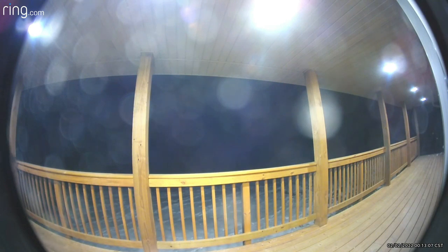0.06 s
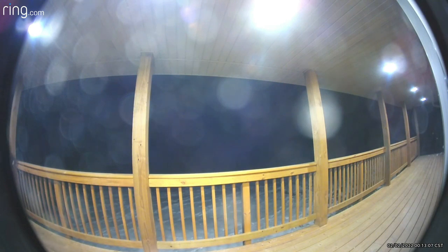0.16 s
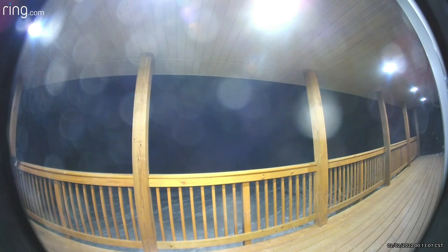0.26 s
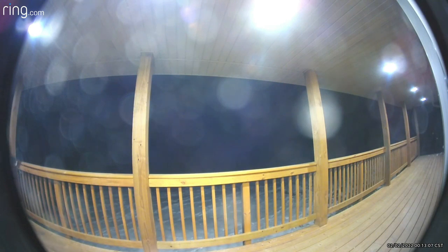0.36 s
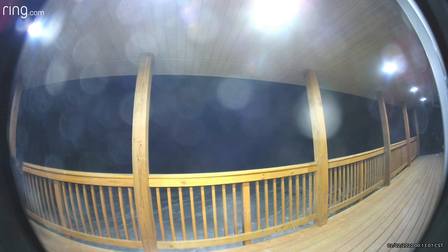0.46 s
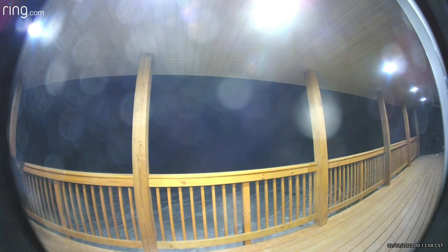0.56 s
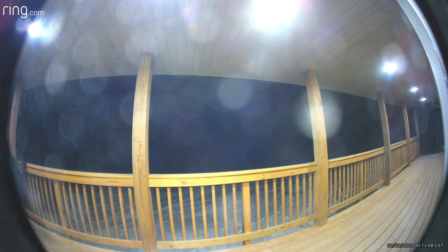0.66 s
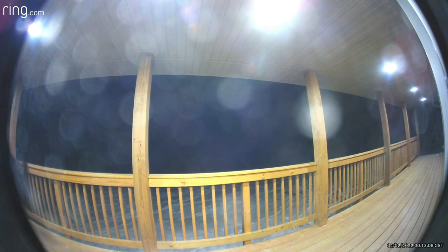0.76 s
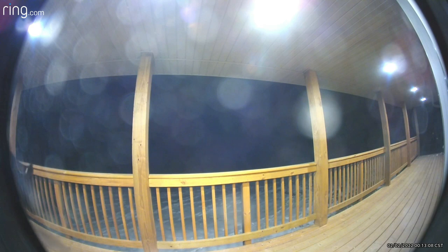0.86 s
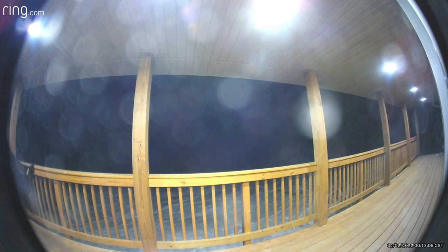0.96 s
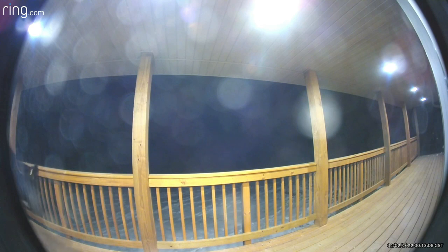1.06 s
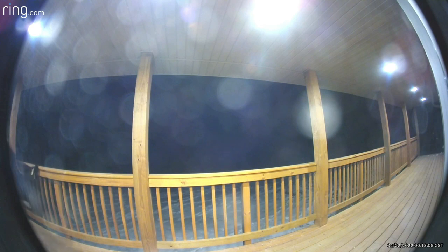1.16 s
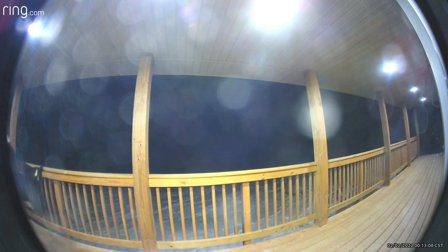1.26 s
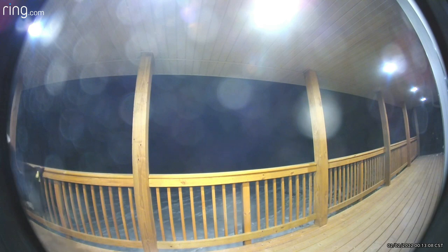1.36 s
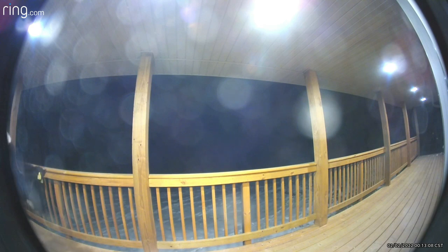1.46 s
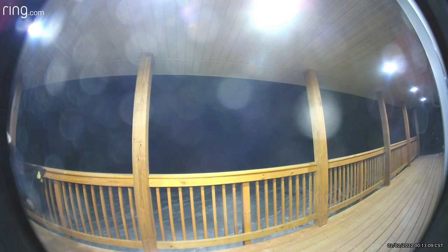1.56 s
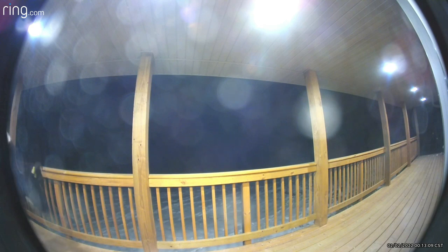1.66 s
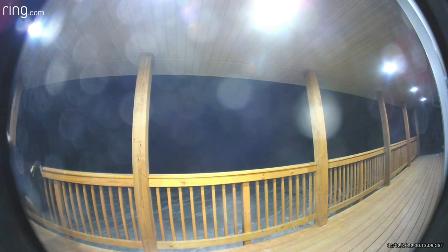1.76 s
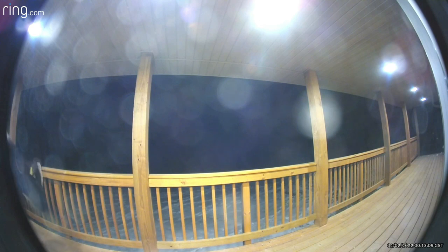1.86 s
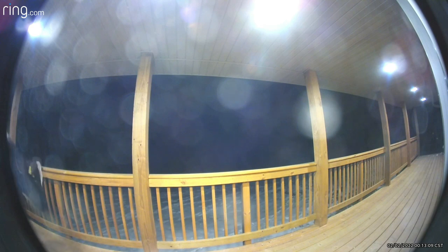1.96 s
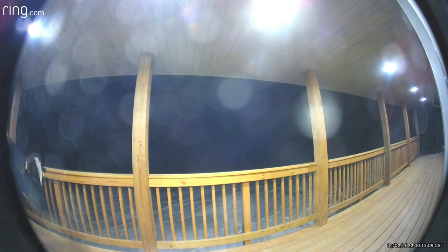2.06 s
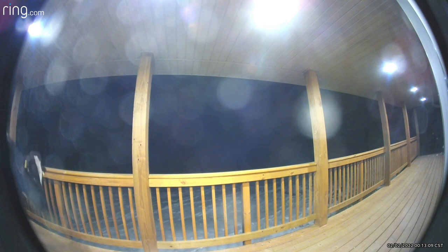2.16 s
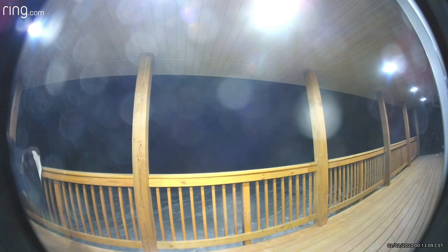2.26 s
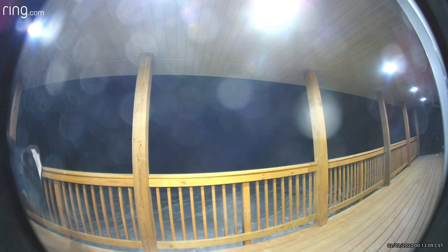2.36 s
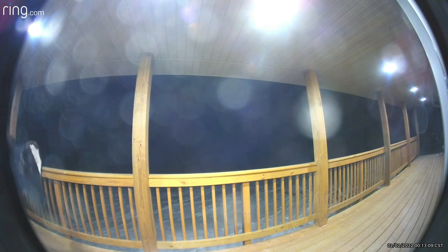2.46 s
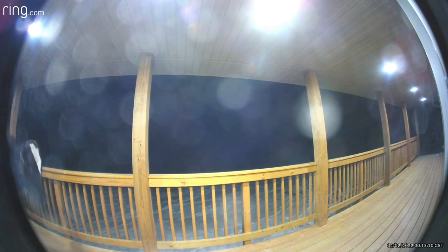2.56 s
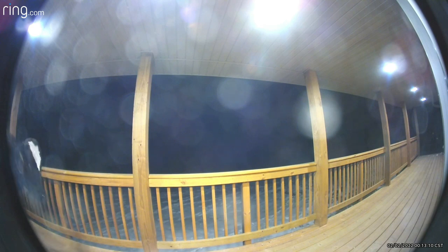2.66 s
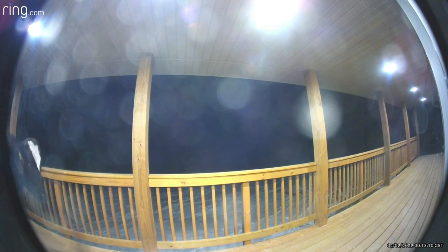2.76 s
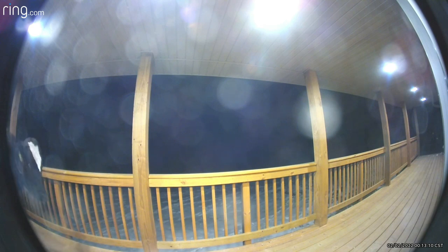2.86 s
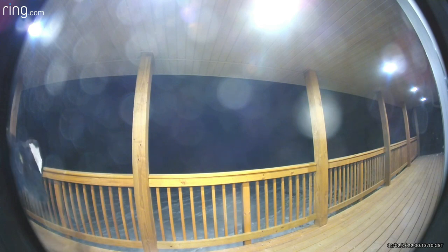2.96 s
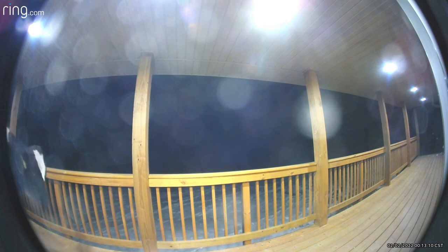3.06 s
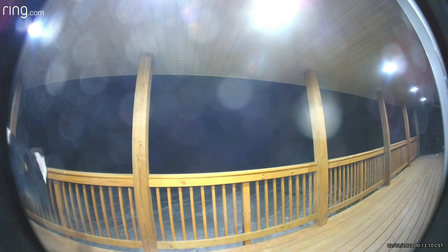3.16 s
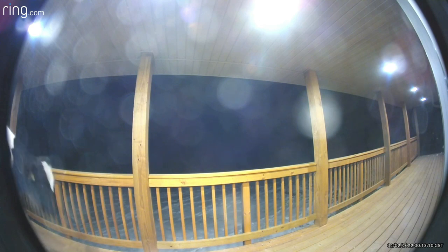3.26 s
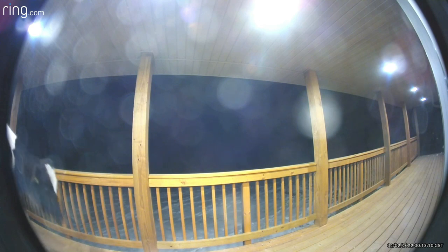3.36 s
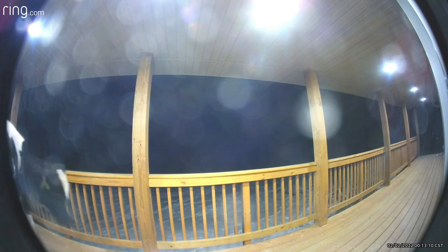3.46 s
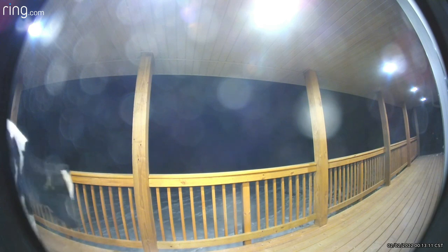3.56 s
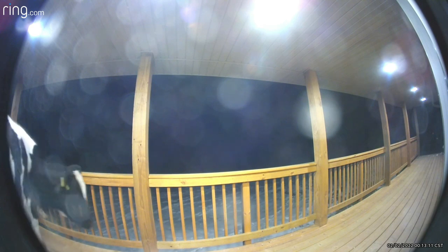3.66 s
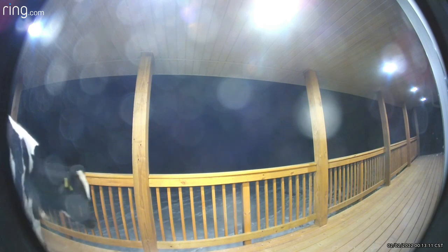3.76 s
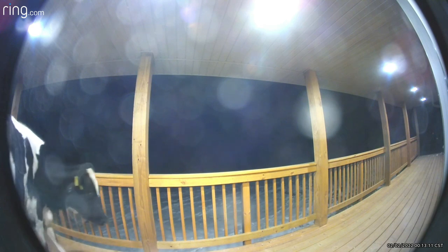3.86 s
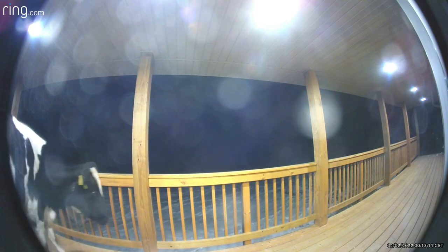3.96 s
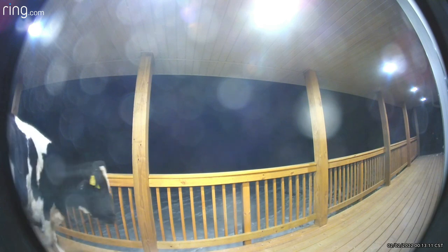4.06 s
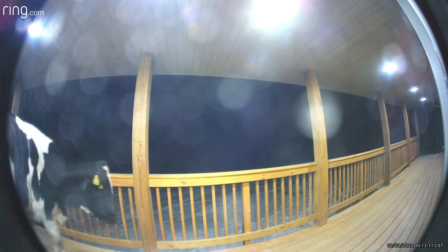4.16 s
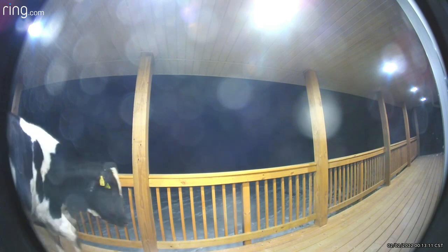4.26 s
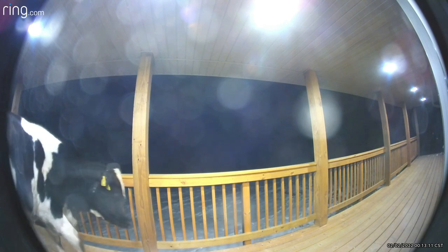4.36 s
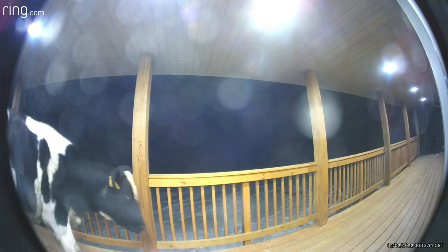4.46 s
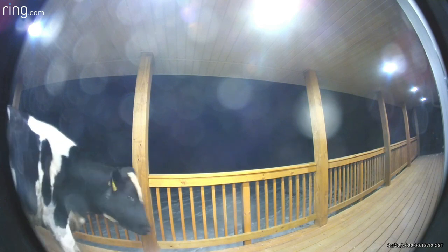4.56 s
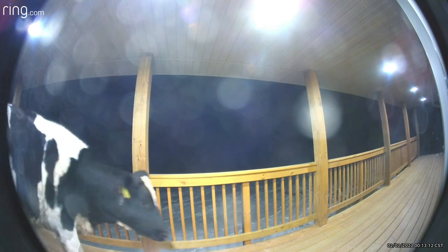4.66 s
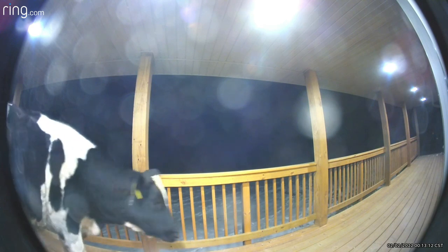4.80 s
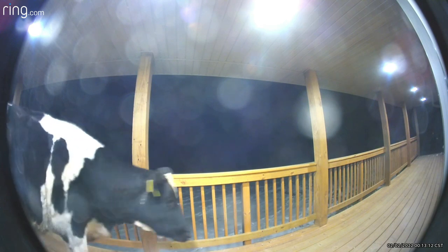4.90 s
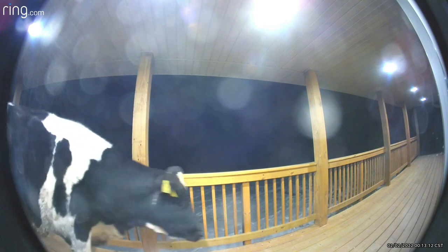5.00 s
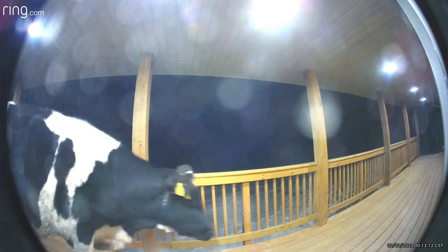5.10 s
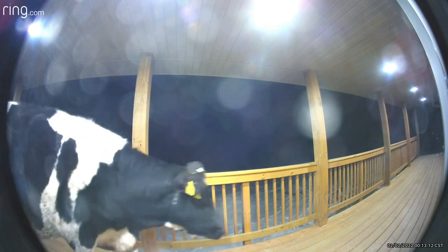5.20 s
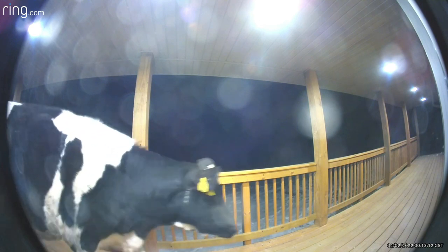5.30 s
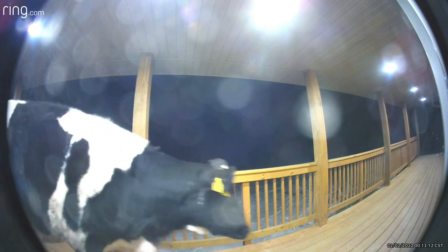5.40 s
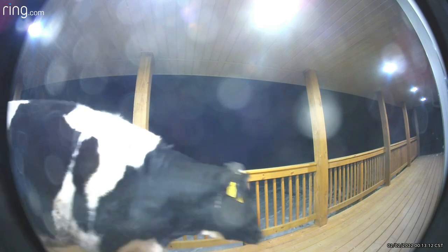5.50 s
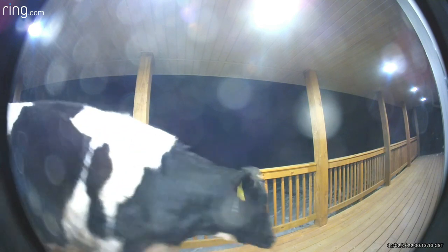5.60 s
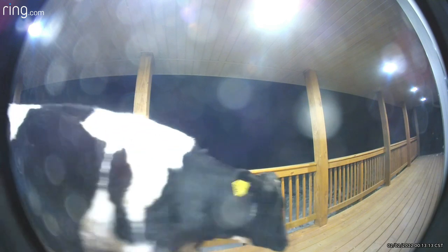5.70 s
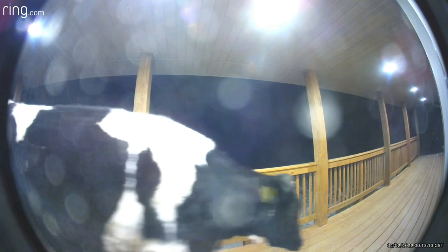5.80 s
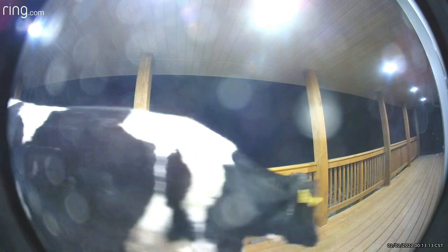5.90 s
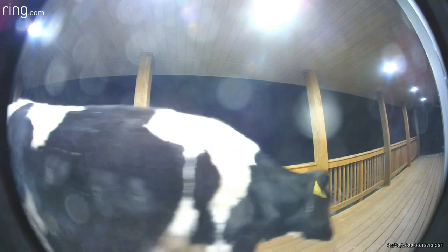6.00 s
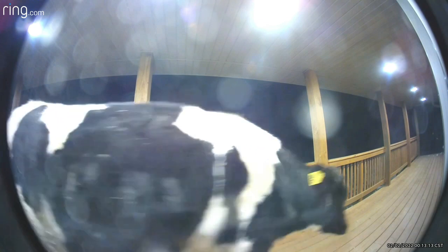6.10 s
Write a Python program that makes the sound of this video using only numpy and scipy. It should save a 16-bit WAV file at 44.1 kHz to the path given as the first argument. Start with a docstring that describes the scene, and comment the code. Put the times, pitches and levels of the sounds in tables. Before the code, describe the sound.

On a roofed wooden porch, a cow steps onto the planks. A few hollow double knocks come early, followed by a quiet gap with faint taps and scuffing. Then heavy hooves resume, closer, denser and louder, with woody thumps, brief scrapes, dry rustling and low deck rumble. A small narrow-band microphone by the door makes everything boxy and slightly dull.

```python
"""A roofed wooden porch: a cow steps up onto the planks and walks towards a small microphone by the door.
Each footfall is two blows, toe then heel; noisy contact forces drive wood resonances and joist sines.
Echo under the roof shrinks as the hooves come nearer. Light taps, sliding hooves and slow deck heaves join in.
Shaped noise makes the deck rumble, hoof scuffs and dry rustling between steps.
The microphone passes a narrow band with a faint treble leak, clips softly and adds a little hiss."""
import sys
import numpy as np
from scipy import signal
from scipy.fft import rfft, irfft, next_fast_len
from scipy.io import wavfile
from scipy.ndimage import uniform_filter1d

SR = 44100
rng = np.random.default_rng(int(sys.argv[2]) if len(sys.argv) > 2 else 0)


def unload_wav(signal):
    """Save mono or channel-first audio to the path in sys.argv[1] as 16-bit WAV at rate SR, clipped to [-1, 1]."""
    wavfile.write(
        sys.argv[1],
        SR,
        np.round(np.clip(np.atleast_2d(signal).T, -1, 1) * 32767).astype(np.int16),
    )


N = 270774

BLOW_S = 0.6  # longest sound of one contact
ATTACK_S = 0.03  # opening stretch that sets the level of a blow
T = np.arange(int(BLOW_S * SR)) / SR

# footfalls: (time [s], plank low mode [Hz], plank high mode [Hz], top of the knock [Hz], strength [dB],
# hardness = toe knock over plank body [dB], weight = toe joist thud over plank body [dB],
# heel after toe [s], heel over toe [dB])
FOOTFALLS = [(0.4885, 434, 1110, 1500, -36, 0.5, -26, 0.024, 0),
             (0.57, 533, 1066, 1460, -23.5, 2.5, -25, 0.013, -8),
             (0.8293, 166, 1210, 2000, -30.5, -5.5, 10, .014, -5),
             (0.8705, 399, 1056, 1700, -14, -1.5, -28, .018, -4),
             (1.8112, 594, 780, 1270, -20, 1.5, -12.5, 0.011, 0.5),
             (3.5272, 410, 987, 1770, -13, -2.5, -11, 0.022, -5),
             (3.794, 354, 810, 1194, -24.5, 5.5, -25.5, 0.016, -6.5),
             (3.925, 404, 686, 1670, -14, -2.5, -12, .031, -6.5),
             (4.051, 216, 780, 1420, -20.5, 5.5, -10, 0.022, 7.5),
             (4.1096, 354, 1020, 1680, -19, 2.5, -8, 0.022, -11),
             (4.317, 395, 743, 1480, -22, 5, -10.5, 0.018, 1.5),
             (4.631, 471, 760, 1780, -16.5, 5.5, -29, .012, -11),
             (4.7663, 409, 745, 1560, -18.5, -4.5, -13.5, 0.017, -4.5),
             (4.9306, 227, 842, 1860, -15, -2, -9, .02, -7.5),
             (4.9391, 379.5, 906, 1970, -6.5, -7, -13, 0.023, -6.5),
             (5.087, 385, 780, 1050, -22, -1, -16, 0.024, -2),
             (5.179, 207.6, 840, 1770, -14, -0.5, -8.5, .021, 0),
             (5.366, 375, 1480, 1990, -29, 0, -15, .022, 4),
             (5.455, 538, 820, 1930, -7, -6.5, -9, 0.011, -10),
             (5.5078, 428, 876, 1470, -15.5, -16.5, -22, .02, -13),
             (5.5449, 457, 1140, 1860, -16.5, -7.5, -20, 0.011, -10),
             (5.6103, 369, 1160, 1890, -14.5, 7, -10, .014, -3.5),
             (5.6541, 447, 1190, 1760, -16.5, -5, -11, .02, -15),
             (5.695, 292, 1095, 1600, -20.5, -9.5, -7, 0.023, -6),
             (6.0251, 359, 750, 1820, -12.5, -2, -3, 0.031, -4.5),
             (6.0823, 406, 773, 1370, -27, 1, -15, .02, -16)]
# resonances of the planking, before scatter: (frequency [Hz], width [Hz], level [dB])
PLANK_RESONANCES = [(222.6, 61, -6.5), (304.7, 42, -1), (409.7, 60.4, 2), (514, 122, 0.5), (643, 414, -7)]
# resonances of horn on wood, before scatter: (frequency [Hz], width [Hz], level [dB])
KNOCK_RESONANCES = [(728, 174, -1.5), (1037, 354, 4), (1250, 478, 5), (1405, 231, 2), (1723, 250, -13)]
# spectrum of the sharp crack at contact: (frequency [Hz], level [dB])
CRACK_COLOUR = [(900, -22), (1700, -3.5), (2200, 2.5), (2700, 1.5), (3500, 5), (4400, -0.5), (5500, -1.5),
                (9000, -25)]
# spectrum of a hoof rubbing the grain: (frequency [Hz], level [dB])
SCUFF_COLOUR = [(100, -18.5), (200, -6.5), (300, 2.5), (420, 0.5), (620, -6), (800, -7.5), (1150, -13.5),
                (1600, -16.5), (2400, -28.5), (4000, -30)]


def hooves():
    """Every footfall is two blows on the same plank: the hard toe, then the heel."""
    toe_ring_t60_s, heel_ring_t60_s = 0.055, 0.099
    # the heel is softer in contact and has less joist thud over its plank body
    heel_hardness_db, heel_weight_db = -9.5, -3
    out = np.zeros(N)
    for s, low_hz, high_hz, top_hz, db, hardness_db, weight_db, heel_s, heel_db in FOOTFALLS:
        toe = blow(s, low_hz, high_hz, top_hz, db, hardness_db, weight_db, toe_ring_t60_s)
        heel = blow(s, low_hz, high_hz, top_hz, db + heel_db, hardness_db + heel_hardness_db,
                    weight_db + heel_weight_db, heel_ring_t60_s)
        add(out, s, toe)
        add(out, s + heel_s, heel)
    return out


def blow(s, low_hz, high_hz, top_hz, body_db, hardness_db, weight_db, ring_t60):
    """One contact of a hoof: joist thud, plank body, the knock of horn and a short crack."""
    wet_db = wetness_db(s)
    body_force = contact(direct_db=-7.5, chatter_t60=0.15, porch_db=wet_db, porch_t60=0.22)
    body = soften(resonate(body_force, PLANK_RESONANCES, scatter_db=3.5), hz=980)
    knock_force = contact(direct_db=-7, chatter_t60=0.19, porch_db=wet_db, porch_t60=0.19)
    knock = resonate(knock_force, KNOCK_RESONANCES, scatter_db=1.95)
    crack_force = contact(direct_db=-0.5, chatter_t60=0.067, porch_db=wet_db, porch_t60=0.11)
    crack = struck(colour(crack_force, CRACK_COLOUR))

    # a softer landing gives a duller knock
    knock = soften(soften(knock, top_hz), top_hz)
    knock = mellow(knock, hz=1240, t60=0.55)
    # the plank under the hoof favours its own pitch
    knock = knock + band(knock, high_hz, width=680)
    body = struck(struck(body) + plank_mode(low_hz, 1.65 * ring_t60))
    knock = struck(struck(knock) + undb(-9.0) * plank_mode(high_hz, 0.48 * ring_t60))

    # crack over knock: -16 dB at a 1716 Hz top, 17.5 dB more per octave of sharper contact
    crack_db = -16 + 17.5 * np.log2(top_hz / 1716)
    thud = undb(weight_db) * joists(distance(s))
    attack = undb(hardness_db) * (knock + undb(crack_db) * crack)
    return undb(body_db) * (body + thud + attack)


def contact(direct_db, chatter_t60, porch_db, porch_t60):
    """One push, separate rebounds and nearby echoes, then the wash under the porch roof."""
    hits = rng.standard_normal(len(T)) * (rng.random(len(T)) < 3500 / SR)  # 3500 per second
    chatter = hits * fade(chatter_t60)
    wash = rng.standard_normal(len(T)) * fade(porch_t60) * (1 - fade(0.25))
    force = chatter / np.linalg.norm(chatter) + undb(porch_db) * wash / np.linalg.norm(wash)
    force[0] += undb(direct_db)
    return force


def resonate(x, modes, scatter_db):
    """Broad wood resonances; each blow weights them differently, as each spot on the deck would."""
    out = 0
    for k, (hz, width, db) in enumerate(modes):
        gain = undb(db + scatter_db * rng.standard_normal())
        out = out + (-1) ** k * gain * band(x, hz, width)  # alternate polarity
    return out


def plank_mode(hz, t60):
    """The struck plank's own ring with a weaker neighbour that beats against it."""
    neighbour_hz = hz * (1 + 0.15 * rng.standard_normal())
    pair = np.sin(2 * np.pi * hz * T) + 0.089 * np.sin(2 * np.pi * neighbour_hz * T)
    return struck(pair * fade(t60) * (1 - fade(0.0011)))


def joists(metres):
    """The weight arrives slowly and sets the joists swinging; distance weakens their higher modes."""
    # joist modes, before scatter and distance loss: (frequency [Hz], level [dB], t60 [s])
    joist_modes = [(49, -23, 0.22), (69.5, -5.5, .55), (92.1, -1, 0.53), (112.5, -2, 0.36),
                   (125.6, -13, 0.27), (175.3, 5, 0.44), (210, 1.5, 0.084)]
    sway = 0
    for hz, db, t60 in joist_modes:
        detune, size, phase = rng.standard_normal(3)
        loss_db = 5 * metres * max(np.log2(hz / 125), 0)
        gain = undb(db + 2 * size - loss_db)
        swing = np.sin(2 * np.pi * hz * (1 + 0.019 * detune) * T + np.pi * phase)
        sway = sway + gain * fade(t60) * swing
    # slow onset, then a quick drop to a weak lingering ring
    return struck(sway * (1 - fade(0.08)) * (0.1 + fade(0.044)))


def mellow(x, hz, t60):
    """The bright part of a knock dies first and leaves only what lies under hz."""
    return x * fade(t60) + soften(x, hz) * (1 - fade(t60))


def distance(s):
    """Metres from the hoof to the door, as the cow walks nearer."""
    # the approach: (time [s], distance [m])
    approach = [(0, 4.7), (3.5, 3), (6.14, 1.8)]
    return max(np.interp(s, *np.transpose(approach)), 0.5)


def wetness_db(s):
    """The further off the hoof, the greater the share of the porch's echo."""
    return 10 * np.log10(distance(s)) - 12


def taps():
    """Light touches of a hoof edge or a loose board ring the planks without any joist thud."""
    # touches: (time [s], strength [dB], sharpness = crack over plank body [dB])
    touches = [(0.014, -42, -7), (0.063, -38.5, -8.5), (0.131, -40, -15), (0.292, -35.5, -11.5),
               (0.559, -31.5, -13), (1.139, -31.5, -5.5), (1.267, -41.5, -15), (1.292, -38, -12.5),
               (1.332, -36.5, -10), (1.55, -37.5, -13), (1.723, -39.5, -12.5), (1.954, -31.5, -13.5),
               (2.014, -39, -9), (2.053, -38.5, -10.5), (2.145, -34, -11.5), (2.188, -35.5, -13.5),
               (2.434, -36.5, -16), (3.163, -39, -21), (3.205, -29.5, -15), (3.291, -30, -34),
               (3.31, -31.5, -15), (3.505, -25.5, -25), (3.576, -28.5, -5), (3.699, -29.5, -9.5),
               (3.884, -27, -7.5), (4.164, -31.5, -15), (4.234, -34.5, -3), (4.542, -33.5, -13.5),
               (4.667, -26, -5.5), (4.734, -30, -16), (4.903, -28.5, -12), (5.152, -29.5, -20)]
    knock_db = -4.5  # knock over plank body
    out = np.zeros(N)
    for s, db, sharpness_db in touches:
        wet_db = wetness_db(s)
        body_force = contact(direct_db=-9.5, chatter_t60=0.2, porch_db=wet_db, porch_t60=0.042)
        body = soften(resonate(body_force, PLANK_RESONANCES, scatter_db=0.0), hz=930)
        knock_force = contact(direct_db=-4.0, chatter_t60=0.21, porch_db=wet_db, porch_t60=0.069)
        knock = soften(resonate(knock_force, KNOCK_RESONANCES, scatter_db=2.0), hz=2200)
        crack_force = contact(direct_db=-10.5, chatter_t60=0.046, porch_db=wet_db, porch_t60=0.08)
        crack = colour(crack_force, CRACK_COLOUR)
        tap = struck(body) + undb(knock_db) * struck(knock) + undb(sharpness_db) * struck(crack)
        add(out, s, undb(db) * tap)
    return out


def slides():
    """A hoof sliding before it grips catches on the grain; the slips swell, excite a plank and die away."""
    # slides: (start [s], length [s], level [dB], plank mode [Hz], mode above the broad scuff [dB])
    slide_rows = [(0.813, 0.067, -28, 1135, -10), (2.301, 0.47, -38.5, 501, -9),
                  (3.443, 0.082, -27.5, 430, -29), (3.77, 0.058, -22.5, 908, 12),
                  (4.329, 0.043, -22.5, 408, 4), (5.053, 0.063, -20, 780, -0.5),
                  (5.36, 0.037, -25.5, 1480, 7)]
    out = np.zeros(N)
    for s, length, db, hz, mode_db in slide_rows:
        slips = grains(rate=9700, spread_db=1.0, size=len(T))
        mode = soften(band(slips, hz, width=19), hz=3.9 * hz)
        rub = unit(unit(colour(slips, SCUFF_COLOUR)) + undb(mode_db) * unit(mode))
        pressure = np.sin(np.pi * np.minimum(T / length, 1))
        add(out, s, undb(db) * pressure * rub)
    return out


def heaves():
    """Full weight shifts set the whole frame swaying in one low mode that dies slowly."""
    # weight shifts: (time [s], sway level before its onset and decay [dB])
    shifts = [(0.829, -34), (1.811, -42), (3.53, -34.5), (4.06, -41), (4.94, -41), (5.455, -48),
              (6.027, -26)]
    frame_hz, frame_t60_s = 35.4, 1.5
    out = np.zeros(N)
    for s, db in shifts:
        age = np.maximum(np.arange(N) / SR - s, 0)
        sway = np.sin(2 * np.pi * frame_hz * age) * fade(frame_t60_s, age) * (1 - fade(0.11, age))
        out += undb(db) * sway
    return out


def shuffling():
    """The loaded deck rumbles and hooves shift on its grain, with a swell after each footfall."""
    # background between the steps: (time [s], deck rumble level [dB], hoof scuff level [dB])
    between_steps = [(0.0, -32.5, -31.5), (0.16, -51, -51), (0.78, -61, -57), (1.05, -43, -42.5),
                     (1.45, -58.5, -60.5), (2.0, -50, -39), (2.25, -53, -64), (2.7, -58, -57),
                     (3.1, -66, -63), (3.46, -52.5, -52), (3.68, -50, -33.5), (4.1, -35, -31),
                     (4.45, -34.5, -40), (4.85, -30, -27.5), (5.38, -41, -38), (5.62, -35, -29.5),
                     (5.87, -36, -44.5), (6.14, -53, -37)]
    # spectrum of the deck rumble: (frequency [Hz], level [dB])
    rumble_colour = [(20, -36), (35, -20), (50, -27), (70, 4.5), (95, -6.5), (140, -6), (175, -6.5),
                     (260, -10.5), (500, -16)]
    rumble_db, scuff_db = curves(between_steps)
    s, _, _, _, strength_db, _, weight_db, _, _ = np.transpose(FOOTFALLS)
    # the rumble follows the joist thud, the grinding scuff follows the strength
    shaken = aftermath(s, strength_db + weight_db - 10.5, t60=0.93)
    ground = aftermath(s, strength_db - 16, t60=0.2)
    rumble = unit(soften(colour(rng.standard_normal(N), rumble_colour), hz=600))
    scuff = unit(colour(grains(rate=3000, spread_db=0.0, size=N), SCUFF_COLOUR))
    scuff = scuff * undb(0.34 * walk(23))  # slightly uneven
    return rumble * np.hypot(undb(rumble_db), shaken) + scuff * np.hypot(undb(scuff_db), ground)


def aftermath(times, levels_db, t60):
    """Envelope that every footfall lifts and that then dies away; overlaps add in power."""
    power = np.zeros(N)
    for s, db in zip(times, levels_db):
        add(power, s, (undb(db) * fade(t60) * (1 - fade(0.2))) ** 2)
    return np.sqrt(power)


def rustling():
    """Something dry brushes against the animal in uneven strokes; each swells and fades alike."""
    # strokes: (time of the peak [s], length [s], peak level [dB])
    strokes = [(0.35, .5, -55), (0.904, 0.13, -38), (1.096, 0.049, -41.5), (1.82, 0.42, -54),
               (2.503, 0.32, -43.5), (3.036, 0.2, -46.5), (3.224, 0.14, -38), (3.468, 0.047, -39),
               (3.756, 0.36, -34.5), (4.253, 0.29, -35.5), (4.65, 0.2, -36), (4.836, 0.28, -33.5),
               (5.628, 0.22, -40.5), (5.997, 0.057, -44)]
    # spectrum of the dry crinkle: (frequency [Hz], level [dB])
    rustle_colour = [(1000, 2.5), (1900, -3), (2550, -7.5), (3400, 2), (4300, 3), (4900, -1), (7000, -19.5)]
    # level at a stroke's ends against its peak, roundness of the peak, floor under the strokes
    edge_db, shape, rest_db = -6.5, 1.28, -62
    t = np.arange(N) / SR
    power = undb(rest_db) ** 2
    for s, length, db in strokes:
        from_peak = np.abs(2 * (t - s) / length)  # 1 at either end
        power = power + undb(db + edge_db * from_peak ** shape) ** 2
    crinkle = unit(colour(grains(rate=7000, spread_db=-1.0, size=N), rustle_colour))
    return crinkle * np.sqrt(power) * undb(1.5 * walk(35))


def grains(rate, spread_db, size):
    """Dense tiny slips of unequal strength, rate per second on average."""
    spread = undb(spread_db * np.minimum(rng.exponential(size=size), 5))
    strength = spread * rng.standard_normal(size)
    return strength * (rng.random(size) < rate / SR)


def walk(rate):
    """Random levels held 1 / rate s and slewed twice; rms 1."""
    k = int(SR / rate)
    held = np.repeat(rng.standard_normal(N // k + 1), k)
    slewed = uniform_filter1d(uniform_filter1d(held, k), k)
    return unit(slewed[:N])


def curves(table):
    """Join a table's rows by straight lines, one control per column."""
    s, *columns = np.transpose(table)
    return [np.interp(np.arange(N) / SR, s, c) for c in columns]


def undb(db):
    """Decibels to gain."""
    return 10 ** (np.asarray(db) / 20)


def fade(t60, t=T):
    """Decay that loses 60 dB in t60 seconds."""
    return np.exp(-np.log(1000) * t / t60)


def unit(x):
    """Scale to rms 1."""
    return x / np.sqrt(np.mean(x ** 2))


def struck(x):
    """Scale a blow to rms 1 over its attack."""
    return x / np.sqrt(np.mean(x[:int(ATTACK_S * SR)] ** 2))


def colour(x, points):
    """Causal minimum-phase filter with the given (Hz, dB) spectrum."""
    hz, db = np.transpose(points)
    n = 2 * next_fast_len(len(x))
    freq = np.maximum(np.arange(n // 2 + 1) * SR / n, 1)
    gain = undb(np.interp(np.log(freq), np.log(hz), db))
    cepstrum = irfft(np.log(gain))
    # folding the cepstrum forward in time makes the filter causal
    cepstrum[1:n // 2] *= 2
    cepstrum[n // 2 + 1:] = 0
    return irfft(rfft(x, n) * np.exp(rfft(cepstrum)))[:len(x)]


def band(x, hz, width):
    """One resonance, gain 1 at its centre."""
    return signal.lfilter(*signal.iirpeak(hz, hz / width, fs=SR), x)


def soften(x, hz):
    """A contact of finite length cannot drive anything much above hz."""
    return signal.sosfilt(signal.butter(4, min(hz, SR / 3), fs=SR, output="sos"), x)


def add(track, s, sound):
    """Mix a sound into the track at s seconds."""
    start = int(np.clip(s * SR, 0, N - 1))
    track[start:start + len(sound)] += sound[:N - start]


def scene():
    """Everything reaches one microphone beside the door."""
    return (hooves() + heaves() + taps() + slides() + shuffling() + rustling())[None]


def overload(x):
    """Soft clipping that rounds the peaks towards the ceiling."""
    ceiling, knee = 0.73, 4.5  # full scale = 1; a higher knee bends later and harder
    return x / (1 + np.abs(x / ceiling) ** knee) ** (1 / knee)


def record(dry):
    """The microphone keeps a narrow band plus a faint full-band leak, overloads on hard knocks and hisses."""
    voice_band_hz, top_hz = 5050, 15700
    leak_db, preamp_db = -43, -92  # leak past the narrow band, hiss before the last filter
    narrow = signal.sosfilt(signal.butter(32, voice_band_hz, fs=SR, output="sos"), dry)
    clipped = overload(narrow + undb(leak_db) * dry)
    noisy = clipped + undb(preamp_db) * rng.standard_normal(N)
    return signal.sosfilt(signal.ellip(8, 0.2, 70, top_hz, fs=SR, output="sos"), noisy)


dry = scene()
out = record(dry)
unload_wav(out)
```